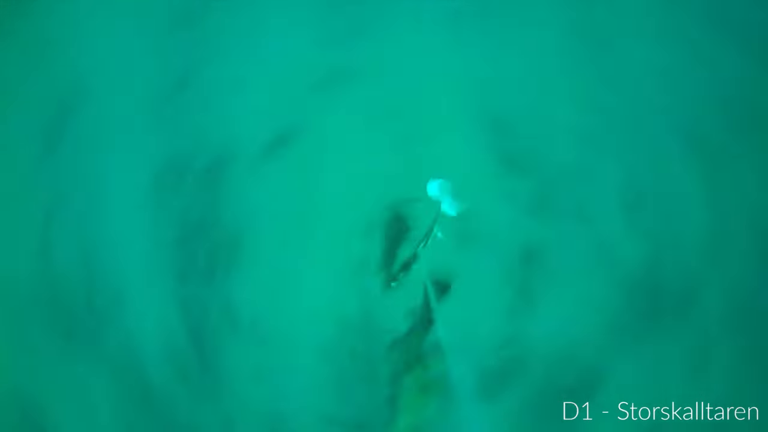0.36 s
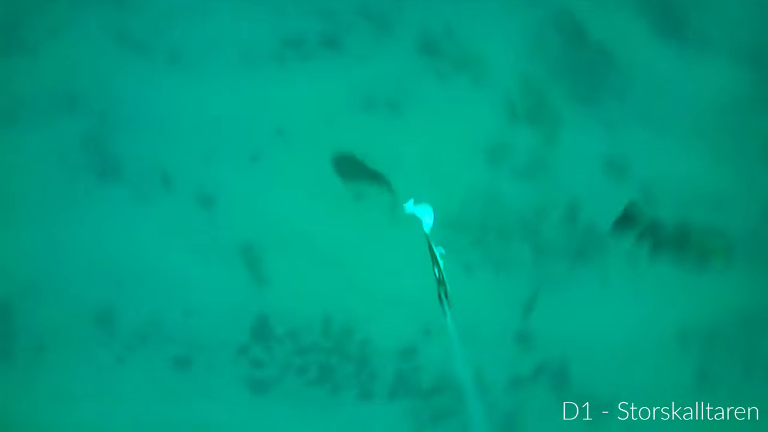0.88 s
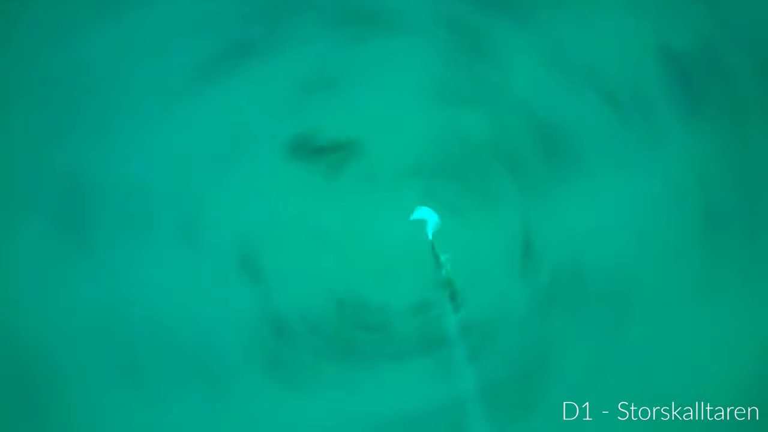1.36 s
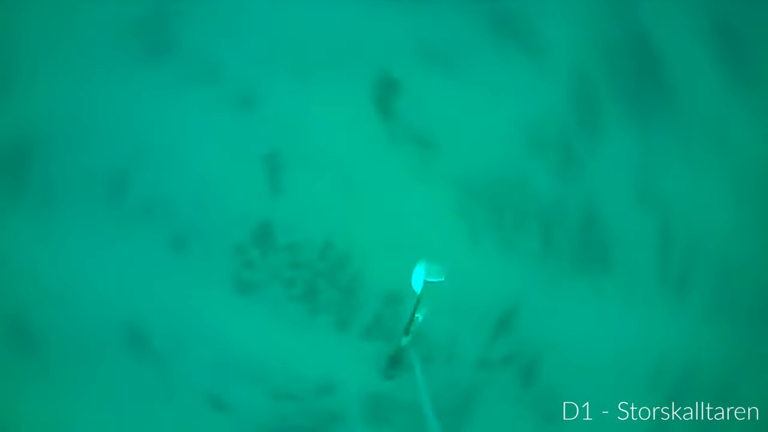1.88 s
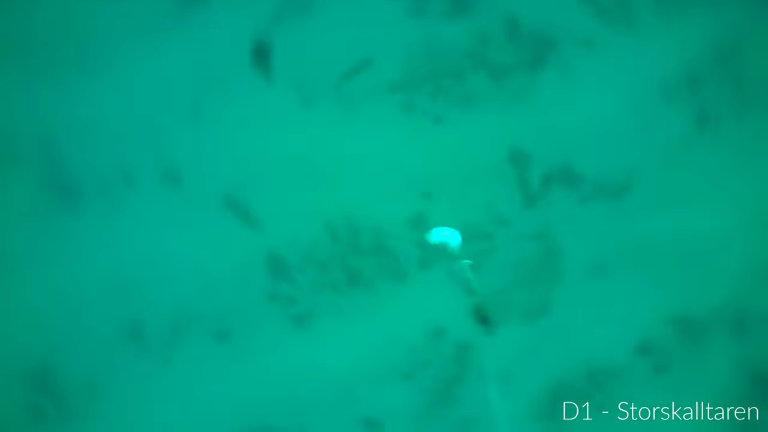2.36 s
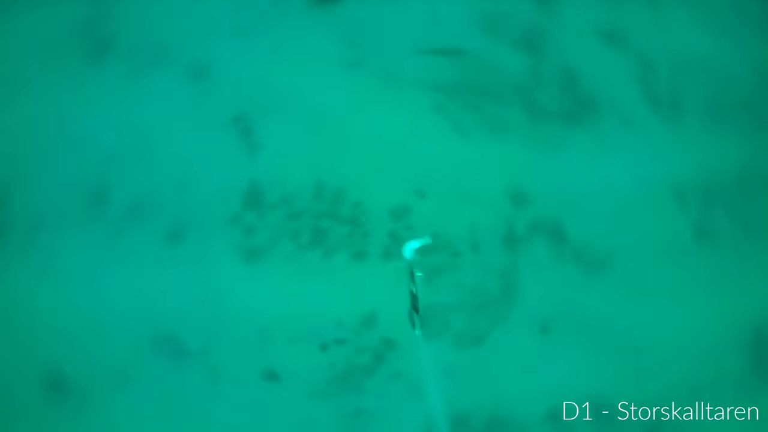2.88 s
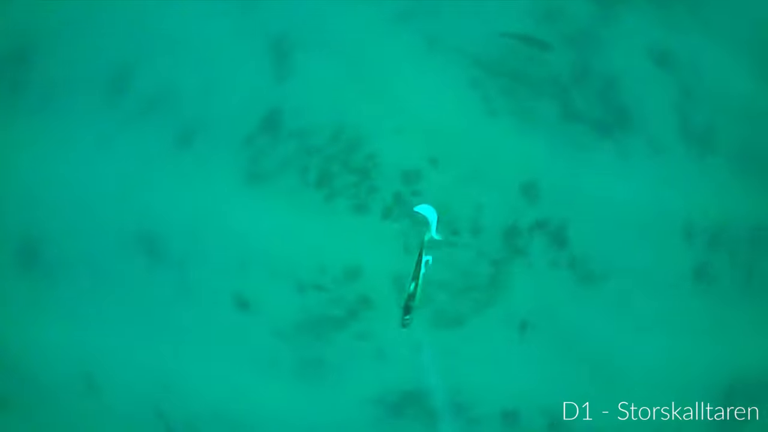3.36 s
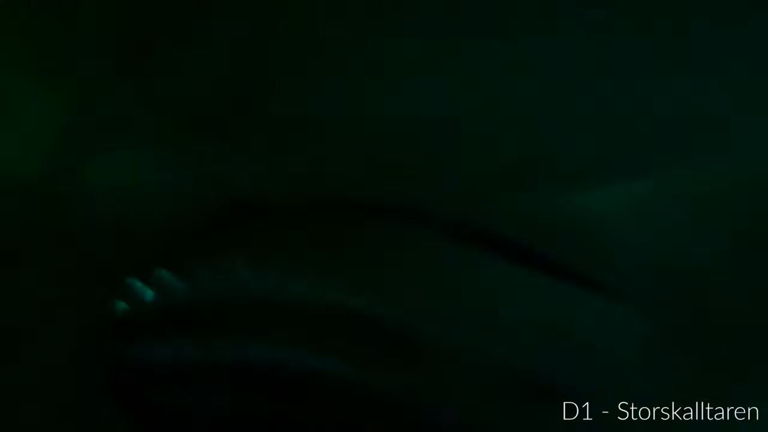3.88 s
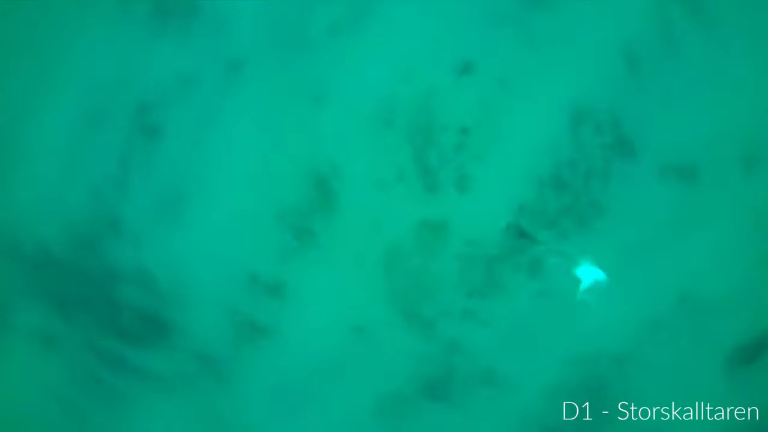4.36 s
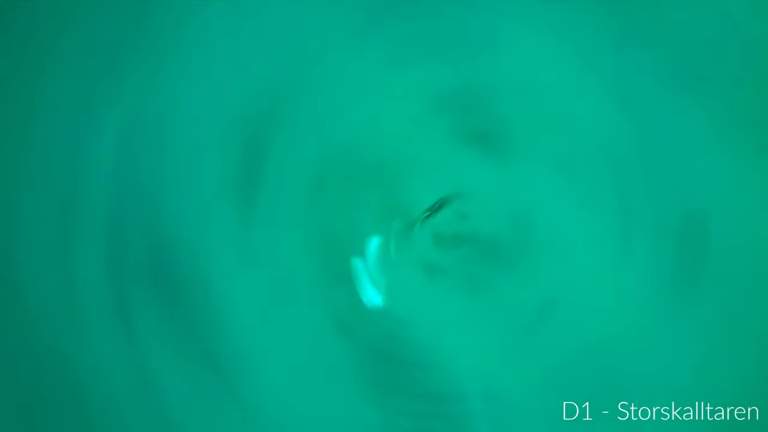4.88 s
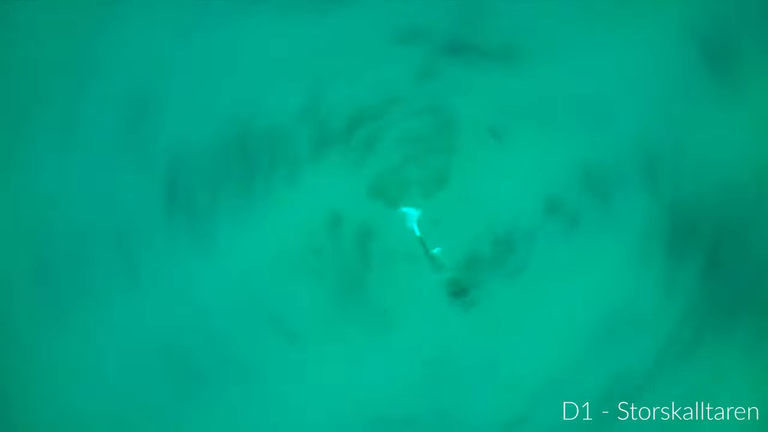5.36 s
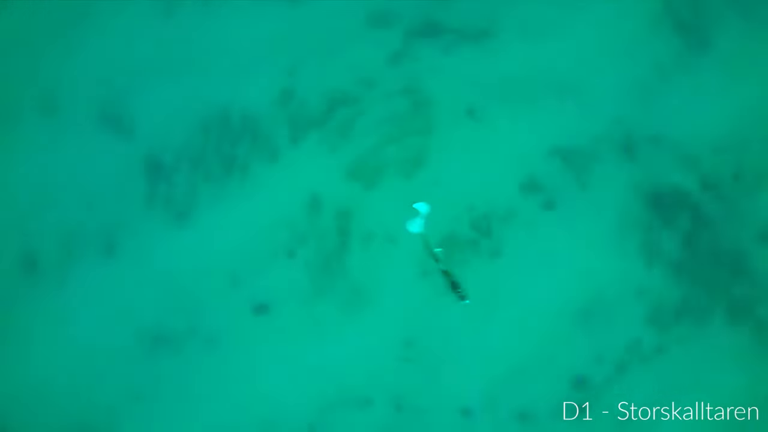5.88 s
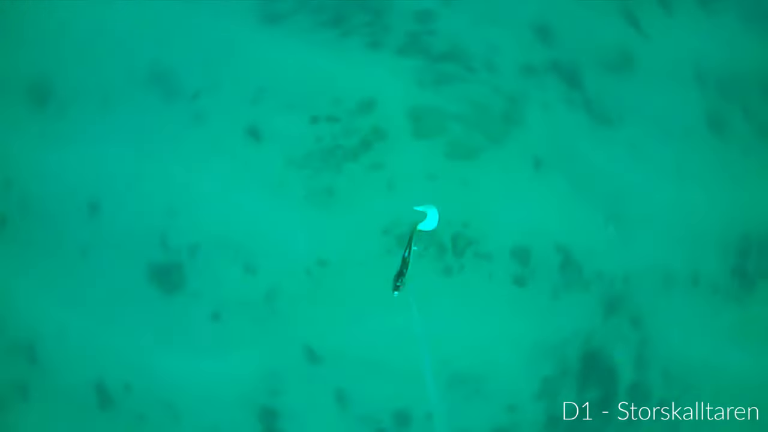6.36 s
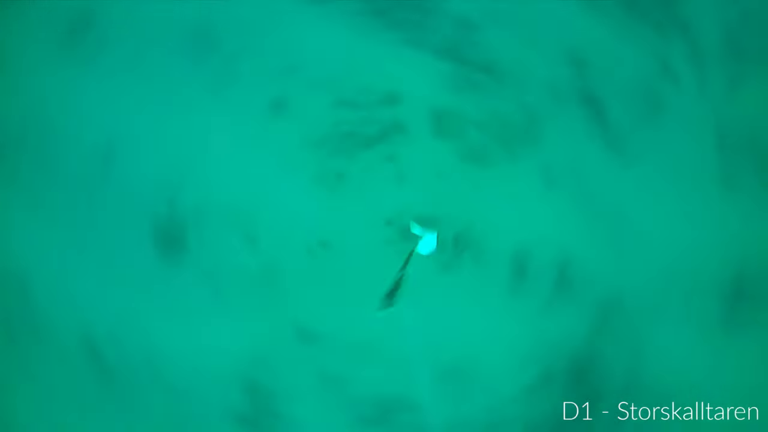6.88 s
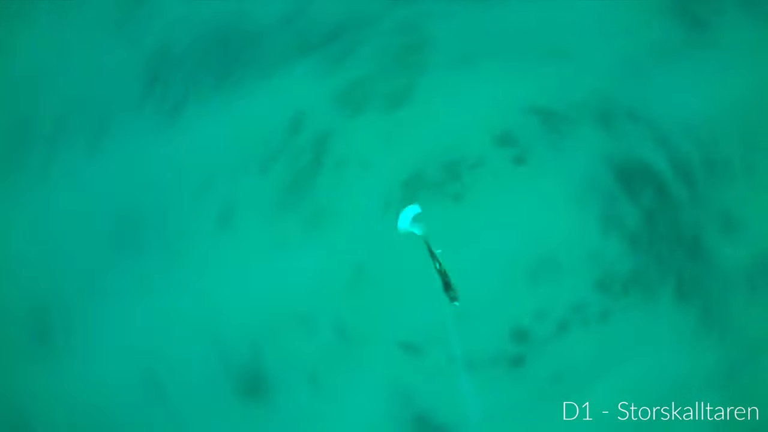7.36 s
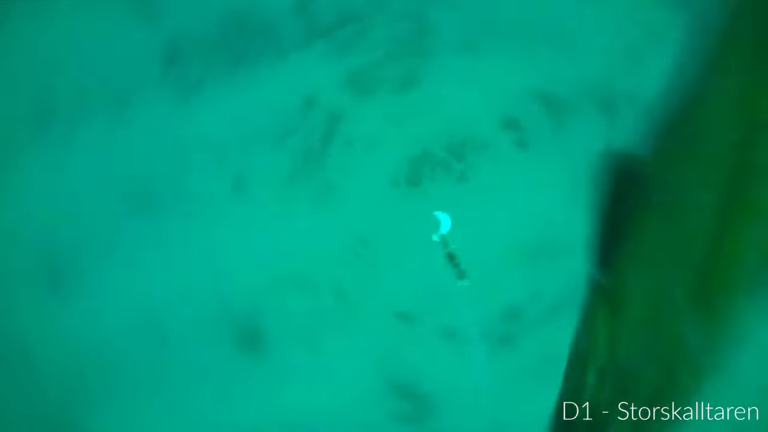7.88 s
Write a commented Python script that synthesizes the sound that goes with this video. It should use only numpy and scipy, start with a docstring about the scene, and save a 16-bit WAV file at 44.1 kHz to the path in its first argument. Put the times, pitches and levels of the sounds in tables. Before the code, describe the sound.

Underwater, a fishing line rubs and ticks against a small plastic camera housing, with bright taps and one violent grinding, thudding jerk midway.

```python
"""A fishing line sticks and slips on the eye of a small plastic camera housing hung under water: dull ticks,
runs of ticks and a rubbing rasp, made from noise bursts and friction noise ringing the housing's modes.
Loose tackle taps brightly, with a rattling tail; a jerk adds bursts of grinding, slow pressure swings
and thuds until the input overloads. Behind them the taut line hums in the current, as two wavering sines,
over shaped noise for the electronics and slow water. One sealed microphone hears it all."""
import sys
import numpy as np
from scipy import signal
from scipy.fft import rfft, irfft, next_fast_len
from scipy.io import wavfile
from scipy.ndimage import uniform_filter1d

SR = 44100
rng = np.random.default_rng(int(sys.argv[2]) if len(sys.argv) > 2 else 0)


def digitize_waveform(pressure):
    """Quantize a signal to 16-bit integers and store it at the path in sys.argv[1].

    Rows of a 2-D input are taken as channels; values are limited to [-1, 1].
    """
    field = np.atleast_2d(pressure).T
    bounded = np.clip(field, -1, 1)
    quanta = np.round(bounded * 32767).astype(np.int16)
    wavfile.write(sys.argv[1], SR, quanta)


def elevation(decibels):
    """Turn decibel levels (scalar or array-like) into linear amplitude ratios."""
    levels = np.asarray(decibels, float)
    return 10 ** (levels / 20)


N = 352359
T = np.arange(N) / SR  # s
STEADY_S = 5.3  # from here the line is under a steady pull
EASING_S = [5.1, STEADY_S]  # over this stretch the pull grows steady


def slips():
    """Clear slips of the line on its eye: dull, short knocks, sharper while the rubbing is sharp."""
    s, db = clear_slips()
    in_run = np.arange(len(s)) >= len(LONE_SLIPS)
    db = db + 1.8 * rng.standard_normal(len(s)) * in_run
    sharp_db = np.interp(s, T, pull()[1]) - 11.5
    return knocks(s, db, sharp_db, push_s=0.0001, tail_s=0.0028, tail_db=-12.0, scatter_db=2.2)


# lone slips of the line on its eye: [t/s, peak level/dB]
LONE_SLIPS = [(0.028, -52), (0.5207, -54), (0.7647, -49.5), (0.7958, -45), (0.804, -42.5), (0.8102, -48),
              (3.0363, -43), (3.051, -41.5), (3.103, -49.5), (3.118, -51.5), (3.907, -36.5), (2.277, -48),
              (2.4849, -44), (2.586, -44), (3.6018, -43), (3.618, -39), (3.9463, -30), (3.9908, -36),
              (4.042, -19), (4.0622, -21), (4.0704, -19.5), (4.1092, -24.5), (4.1914, -20), (4.195, -24.5),
              (4.2401, -39), (4.2933, -39.5), (4.3116, -36.5), (4.356, -45), (4.424, -35.5), (4.5488, -48),
              (4.5692, -47), (4.68, -40), (4.7408, -53), (4.7714, -49), (4.784, -52.5), (4.8115, -55),
              (4.8703, -42.5), (4.921, -28.5), (5.0026, -42), (4.938, -47.5), (5.025, -42.5), (5.071, -47),
              (5.1476, -41), (5.1595, -44.5), (7.23, -38.5), (7.5827, -39), (7.6173, -43), (7.654, -45),
              (7.7096, -41.5)]
# runs of evenly paced slips: [first t/s, last t/s, first peak level/dB, last peak level/dB], before scatter
SLIP_RUNS = [(0.6458, 0.7313, -41.5, -47.5), (0.854, 0.912, -46.5, -49), (0.92, 1.045, -51, -53.5),
             (1.3802, 1.463, -46, -47.5), (1.112, 1.1747, -53, -44.5), (1.2355, 1.306, -46, -51.5),
             (1.5248, 1.6119, -46, -41), (5.2838, 5.3165, -29.5, -33.5), (5.694, 5.768, -52.5, -48),
             (6.116, 6.2015, -53, -45.5), (6.3598, 6.382, -48, -47), (6.6211, 6.8447, -41.5, -41.5),
             (6.953, 6.9855, -44, -41), (7.1836, 7.218, -33, -32.5), (7.2425, 7.3045, -26.5, -26.5),
             (7.323, 7.3712, -29.5, -29), (7.385, 7.401, -30.5, -47), (7.419, 7.4645, -33.5, -40.5),
             (7.7632, 7.869, -38, -38), (7.911, 7.9795, -49, -47)]
# number of slips in each run: [count]
SLIPS_PER_RUN = [9, 6, 11, 7, 6, 6, 9, 3, 6, 6, 3, 13, 3, 3, 5, 4, 2, 4, 7, 5]


def clear_slips():
    """Times and peaks of the lone slips, then of the runs."""
    runs = [np.linspace((first, db), (last, last_db), n)
            for (first, last, db, last_db), n in zip(SLIP_RUNS, SLIPS_PER_RUN)]
    return np.vstack([LONE_SLIPS] + runs).T


def rubbing():
    """Small slips and rebounds over a rasp that fades as the line sticks again; a harsh rub murmurs low."""
    db, sharp_db = pull()
    s = small_slips()
    every = np.sort(np.r_[0, s, clear_times()])
    lead_s = .005  # under the steady pull the slide starts this far ahead of the slip
    start = every - lead_s * (every > STEADY_S)
    since = T - start[np.searchsorted(start, T, side="right") - 1]

    small_db = np.interp(s, T, db) + 3.5 + 2 * rng.standard_normal(len(s))
    small = knocks(s, small_db, np.interp(s, T, sharp_db), 0.0002, 0.0019, -17.5, 6.1)

    # each rebound falls part way to the next contact
    chance = rng.standard_normal((len(every) - 1, 2))
    back = every[:-1] + np.diff(every) * np.clip(0.3 + 0.07 * chance[:, 0], 0, 1)
    back_db = np.interp(back, T, db) + np.interp(back, EASING_S, [-6.0, -1.5]) + 2.5 * chance[:, 1]
    rebound = knocks(back, back_db, np.interp(back, T, sharp_db) + 5.0, 0.00052, 0.0025, -9, 4)

    # under the steady pull a thin part lets go first
    lead = every[every > STEADY_S] - lead_s
    lead_db = np.interp(lead, T, db) + 2.26 * rng.standard_normal(len(lead))
    first_give = knocks(lead, lead_db, np.interp(lead, T, sharp_db) + 4, 0.00037, 0.0025, -12, 3.5)

    slide = np.where(T > STEADY_S, .05, .22) + uniform_filter1d(np.exp(-since / 0.006), size=60)
    slide_db = db + curve(PLACE)[-1] + 3 * flicker(90)
    rasping = slide * elevation(slide_db) * rasp(sharp_db)

    murmur_db = -88.0 + 0.49 * (db + 58.5) + 0.26 * (sharp_db + 8) + 3.5 * flicker(14)
    murmur = elevation(murmur_db) * band(230.0, 520.)
    return small + rebound + first_give + rasping + murmur


def small_slips():
    """Between clear contacts the line goes on sticking and slipping at a nearly even pace."""
    clear = np.sort(np.r_[0, clear_times(), T[-1]])
    period = np.interp(clear, EASING_S, [.011, .0168])  # s; the steady pull slows the slips
    count = np.round(np.diff(clear) / period[1:]).astype(int)
    s = np.concatenate([np.linspace(a, b, n + 1)[1:-1] for a, b, n in zip(clear, clear[1:], count)])
    return s + 0.0016 * rng.standard_normal(len(s))


def clear_times():
    """Times of all clear slips and taps."""
    return np.r_[clear_slips()[0], np.transpose(TAPS)[0]]


# tugs that drag the line over its eye: [peak t/s, rise/s, fall/s, rubbing level/dB, sharpness level/dB]
TUGS = [(0.072, 0.036, 0.013, -51.5, -15), (0.299, 0.19, 0.32, -55, -16.5), (0.72, 0.1, 0.055, -45.5, -8),
        (0.88, 0.049, 0.21, -53.5, -4), (1.011, 0.27, 0.049, -51, -17), (1.15, 0.068, 0.024, -50, -19),
        (1.25, 0.021, 0.09, -43.5, -16.5), (1.451, 0.12, 0.082, -44, -7.5), (1.6, 0.14, 0.12, -48.5, -11.5),
        (1.739, 0.079, 0.025, -47.5, -2.5), (2.491, 0.093, 0.21, -52.5, -5.5),
        (2.84, 0.076, 0.075, -56.5, -5), (2.941, 0.15, 0.14, -56, -10), (3.05, 0.042, 0.015, -45, -1),
        (3.164, 0.03, 0.03, -61.5, -14), (3.228, 0.015, 0.018, -63.5, -7), (3.671, 0.17, 0.051, -62, -35),
        (3.849, 0.2, 0.017, -34.5, -2.5), (3.921, 0.018, 0.092, -43.5, -6), (4.052, 0.088, 0.2, -38.5, -10),
        (4.33, 0.16, 0.16, -49, -13), (4.54, 0.054, 0.085, -65, -1), (4.69, 0.082, 0.047, -55, -7),
        (4.931, 0.26, 0.59, -62.5, -11), (5.15, 0.18, 0.2, -58, 0), (5.3, 0.19, 0.075, -55.5, -7.5),
        (5.42, 0.067, 0.24, -54, -12), (5.72, 0.23, 0.22, -57.5, -11), (6.15, 0.27, 0.15, -57, -14.5),
        (6.391, 0.084, 0.33, -57, -17), (6.76, 0.15, 0.59, -47.5, -9), (7.29, 0.42, 0.1, -44.5, -14.5),
        (7.38, 0.05, 0.12, -39, -12), (7.6, 0.11, 0.53, -49.5, -8.5), (7.831, 0.37, 0.31, -45.5, -9.5)]


def pull():
    """Rubbing level and sharpness: tugs swell and die away, each colouring the rub by its share of power."""
    slack_db, slack_sharp_db = -91, 1.5
    drop_db, shape = 25, 1.166  # lost over one rise or fall; curvature of the swell
    power = np.full(N, elevation(2 * slack_db))
    sharp = power * slack_sharp_db
    for s, rise, fall, db, sharp_db in TUGS:
        near = slice(max(int((s - 3 * rise) * SR), 0), int((s + 3 * fall) * SR))
        away = np.maximum((s - T[near]) / rise, (T[near] - s) / fall)
        tug = elevation(2 * (db - drop_db * away ** shape))
        power[near] += tug
        sharp[near] += tug * sharp_db
    return 10 * np.log10(power), sharp / power


# tackle taps the housing: [t/s, peak level/dB]
TAPS = [(0.2837, -46.5), (0.318, -48.5), (0.332, -41.5), (0.359, -53.5), (1.3385, -44.5), (1.4865, -39.5),
        (1.638, -38), (1.655, -41), (1.705, -47), (1.73, -32.5), (1.742, -33.5), (1.749, -42),
        (1.798, -51.5), (2.431, -51.5), (5.212, -48), (5.412, -46.5), (1.779, -38), (1.952, -53),
        (2.137, -53.5), (2.3853, -46), (2.492, -38.5), (2.5361, -41), (3.078, -42.5), (3.5616, -42.5),
        (3.6307, -40), (3.8436, -24), (3.8548, -33), (4.0234, -35), (4.086, -32.5), (4.097, -28),
        (4.12, -34), (4.3206, -32), (4.3399, -33.5), (5.46, -46.5), (7.0715, -45.5), (7.6004, -47),
        (7.6895, -47), (7.7215, -46)]


def taps():
    """Loose tackle on the housing: sharp knocks with a longer rattle, each of its own colour."""
    s, db = np.transpose(TAPS)
    return knocks(s, db, np.full(len(s), 1.5), push_s=0.00032, tail_s=0.0045, tail_db=-5, scatter_db=5.8)


# ringing modes of the housing: [f/Hz, width f/Hz, relative level/dB]
HOUSING = [(936, 212, -11.5), (1349, 364, -1), (1715, 360, 3.5), (2076, 342, 3.5), (2662, 630, 4),
           (3213, 318, 9.5), (3715, 234, 5.5)]
# thin parts, brought out by sharp contacts: [f/Hz, width f/Hz, relative level/dB]
THIN = [(4920, 530, 1.5), (6290, 900, -6.5), (7480, 434, 0.5), (11000, 3400, -9), (14600, 5700, -14)]
# where a single push is soaked up: [f/Hz, width f/Hz, relative level/dB]
HOLLOW = [(2500, 700, -3)]


def knocks(s, peak_db, sharp_db, push_s, tail_s, tail_db, scatter_db):
    """Short rough contacts with a rattling tail; each meets the modes in its own proportions."""
    size = 2048
    t = np.arange(size) / SR
    modes = len(HOUSING)
    grit = rng.standard_normal((len(s), size))
    share = elevation(scatter_db * rng.standard_normal((len(s), modes + len(THIN))))

    body = (share[:, :modes] * elevation(place_db(s))) @ resonances(HOUSING, size)
    body = body * seal(size) * (1 + resonances(HOLLOW, size)[0])
    thin = elevation(sharp_db)[:, None] * (share[:, modes:] @ resonances(THIN, size))

    # the thin parts buzz through the whole contact, the body takes one short push
    push = np.exp(-((t - .0012) / push_s) ** 2)
    buzz = np.exp(-((t - .0012) / .0009) ** 2)
    blow = peak_one(irfft(rfft(push * grit) * body + rfft(buzz * grit) * thin))
    rattle = np.exp(-t / tail_s) * (1 - np.exp(-t / 0.003))
    tail = peak_one(irfft(rfft(rattle * grit) * (body + thin)))
    rings = peak_one(blow + elevation(tail_db) * tail) * elevation(peak_db)[:, None]

    out = np.zeros(N + size)
    for start, ring in zip((s * SR).astype(int), rings):
        out[start:start + size] += ring
    return out[:N]


def peak_one(x):
    """Scale each row to a peak of 1."""
    return x / np.abs(x).max(axis=1, keepdims=True)


def rasp(sharp_db):
    """Steady friction through the housing; a light touch lets the modes ring narrower than a knock does."""
    size = next_fast_len(N)
    grit = rfft(rng.standard_normal(size))
    narrow = np.multiply(HOUSING, [1, .55, 1])
    modes = irfft(grit * resonances(narrow, size) * seal(size), size)[:, :N]
    drift_db = np.array([3.5 * flicker(9) for _ in HOUSING])  # the contact wanders
    thin = irfft(grit * resonances(THIN, size).sum(axis=0), size)[:N]
    # the body is levelled to rms 1 as it stands before the place and the drift
    body = (modes * elevation(place_db(T).T + drift_db)).sum(axis=0) / modes.sum(axis=0).std()
    return body + elevation(sharp_db) * unit(thin)


VALLEY_HZ = 2450  # parts the housing modes into two groups


def resonances(table, size):
    """Response of each mode over frequency; neighbours alternate in sign but cancel across the valley."""
    hz = np.arange(size // 2 + 1) * SR / size
    rows = []
    for k, (f, width, db) in enumerate(table):
        sign = (-1) ** (k + (f > VALLEY_HZ))
        rows.append(sign * elevation(db) * 1j * hz * width / (f * f - hz * hz + 1j * hz * width))
    return np.array(rows)


def seal(size):
    """The stiff wall holds back the bass, and the trapped air rolls the body off above its top mode."""
    hz = np.arange(size // 2 + 1) * SR / size
    return signal.freqs(*signal.butter(2, [900., 3900.], "bandpass", analog=True), hz)[1]


# where the line bears on the housing favours some modes: [t/s, low-mode level/dB,
# level per octave away from the valley/dB, smooth sliding over rubbing level/dB]
PLACE = [(0.55, -5.5, -22, -3), (0.64, -5.5, 22.5, -24), (1.18, 8, 14, -25.5), (1.23, -4, -13, -9),
         (1.4, -1.5, 6.5, -13), (2.9, -1, 4.5, -5.5), (3.8, 2, 0.5, -5.5), (4.15, 0, 5, -6),
         (4.3, 6, 2.5, -6.5), (5.3, 0.5, 3.5, -19), (5.45, -8, -6, -5.5), (6.25, -10, -16, -0.5),
         (6.35, 3.5, -4, -7), (7.6, -0.5, -3, -6.5)]
# side on, the line scrapes the housing's flank and shifts each mode: [level/dB]
SIDE_ON_DB = [8, -6, -6, 3, -3, 0, -2]


def place_db(s):
    """Gain of each housing mode at the given times; the modes lie in two groups around a valley."""
    when, low_db, outer_db, _ = np.transpose(PLACE)
    octaves = np.log2(np.transpose(HOUSING)[0] / VALLEY_HZ)
    low = np.outer(np.interp(s, when, low_db), octaves < 0)
    # the favour stops growing 0.6 octave from the valley
    outer = np.outer(np.interp(s, when, outer_db), np.minimum(abs(octaves), .6))
    side_on = np.outer((s > 2.2) & (s < 3.3), SIDE_ON_DB)
    return low + outer + side_on


# bursts of the jerk grinding the housing: [t/s, length/s, level/dB], before flicker and housing gain
GRINDS = [(3.702, 0.028, -28.5), (3.733, 0.014, -33), (3.774, 0.0097, -30), (3.787, 0.006, -28.5),
          (3.797, 0.0031, -30), (3.806, 0.0075, -26), (3.816, 0.01, -24), (4.135, 0.008, -38.5)]


def grinding():
    """The jerk grinds the housing: short gated bursts of harsh, fast-flickering rasp."""
    gate = sum(elevation(db) * ((T > s) & (T < s + length)) for s, length, db in GRINDS)
    return uniform_filter1d(gate, size=40) * elevation(5.9 * flicker(250)) * rasp(-2.9)


# the housing lurches: [t/s, swing level/dB, thud over swing level/dB, arrival/(dB/s), swing settling/(dB/s)]
LURCHES = [(3.699, -27.5, -4.5, 3505, 169.5), (3.754, -26, -12.5, 907.5, 190), (3.944, -47.5, -4, 503, 144),
           (4.072, -41.5, -5, 379.5, 191), (4.341, -62, 6, 141.5, 84.5)]


def lurching():
    """The housing rocks on the line: slow pressure swings, sloshing water inside them, and dull thuds."""
    swing_hz = 44
    thud_fade = 156  # dB/s, on top of the settling
    slosh = elevation(-9) * band(8.6, 46.0)
    swing = sum(lurch(s, db, arrive, settle) * (slosh - np.cos(2 * np.pi * swing_hz * (T - s)))
                for s, db, _, arrive, settle in LURCHES)
    thud = sum(lurch(s, db + over_db, arrive, settle + thud_fade)
               for s, db, over_db, arrive, settle in LURCHES)
    return swing + thud * elevation(3.4 * flicker(60)) * band(50.0, 260.0)


def lurch(s, db, arrive, settle):
    """Gain of one lurch: it swells and settles at even rates in dB/s."""
    return elevation(db - np.maximum(arrive * (s - T), settle * (T - s)))


# the line sways in the current and is tugged along it at twice the pace, before wavering:
# [t/s, sway f/Hz, sway level/dB, octave level/dB]
HUM = [(0.1, 102.4, -84.5, -98), (0.35, 121, -82, -90), (0.49, 104.1, -73.5, -95), (0.65, 99.4, -79, -86),
       (0.87, 85, -79.5, -79), (1.05, 76.1, -88, -84.5), (1.36, 81.9, -71.5, -80.5), (1.47, 61.8, -88, -90),
       (1.59, 54.7, -80, -71), (1.86, 62.1, -91, -77), (1.96, 78.6, -92, -80.5), (2.07, 58.2, -90, -71.5),
       (2.18, 70.4, -88, -87.5), (2.42, 52.85, -102.5, -79), (2.95, 52.13, -102, -106),
       (3.18, 55.5, -97.5, -71), (3.5, 55.5, -93, -67.5), (3.7, 55.14, -100, -100), (5.1, 64.36, -100, -94),
       (5.33, 65, -99.5, -78), (5.72, 56.6, -100, -79), (6.68, 56.14, -100, -83.5),
       (6.95, 56.13, -106, -71), (7.27, 62.18, -100, -82.5), (7.78, 55.97, -104, -77)]


def hum():
    """Eddies shed by the line make it hum; they come unevenly, so each partial wavers and breaks up."""
    hz, db, octave_db = curve(HUM)
    phase = 2 * np.pi * np.cumsum(hz * (1 + .05 * flicker(11))) / SR
    sway = elevation(db + 4.5 * flicker(18)) * np.sin(phase)
    octave = elevation(octave_db + 2.2 * flicker(12)) * np.sin(2 * phase)
    return np.sqrt(2) * (sway + octave)


# colour of the hiss: [f/Hz, relative level per Hz/dB]
HISS = [(12, -32.5), (20, -9), (60, -13.5), (138, -13.5), (222, -25), (1000, -30), (8000, -39.5),
        (16000, -37.5)]


def hiss():
    """Electronics and slow water: steady noise shaped over frequency, at -81 dB rms."""
    hz, db = np.transpose(HISS)
    bins = np.arange(1, N // 2 + 2) * SR / N
    colour = elevation(np.interp(np.log(bins), np.log(hz), db))
    return elevation(-81) * unit(irfft(rfft(rng.standard_normal(N)) * colour, N))


def curve(rows):
    """Columns of a table, joined by straight lines in time."""
    s, *columns = np.transpose(rows)
    return [np.interp(T, s, c) for c in columns]


def unit(x):
    """Scale to rms 1."""
    return x / np.sqrt(np.mean(x ** 2))


def flicker(rate):
    """Random levels held 1 / rate s and slewed; spread near 1."""
    k = int(SR / rate)
    held = np.repeat(rng.standard_normal(N // k + 1), k)
    return unit(uniform_filter1d(held, k)[:N])


def band(low_hz, high_hz):
    """Noise in a band, rms 1."""
    sos = signal.butter(2, [low_hz, high_hz], "bandpass", fs=SR, output="sos")
    return unit(signal.sosfilt(sos, rng.standard_normal(N)))


def scene():
    """Everything reaches one sealed microphone."""
    line = slips() + rubbing()
    jerk = grinding() + lurching()
    return (line + taps() + jerk + hum() + hiss())[None]


def roll_off(x):
    """The treble ends steeply here."""
    return signal.sosfilt(signal.butter(12, 16620, fs=SR, output="sos"), x)


def record(dry):
    """The input clips almost hard, near -26 dB, and sits slightly off centre."""
    top = elevation(-26)
    clipped = dry / (1 + np.abs(dry / top) ** 6) ** (1 / 6)
    return roll_off(clipped + 0.00037)


dry = scene()
out = record(dry)
digitize_waveform(out)
```